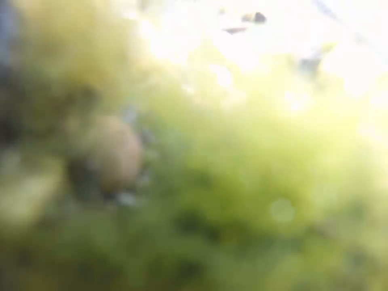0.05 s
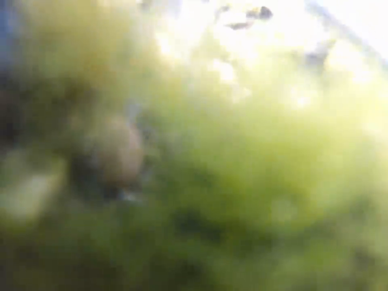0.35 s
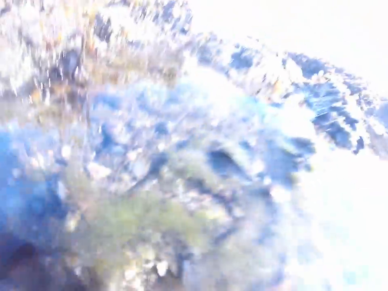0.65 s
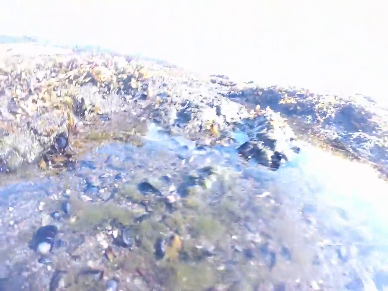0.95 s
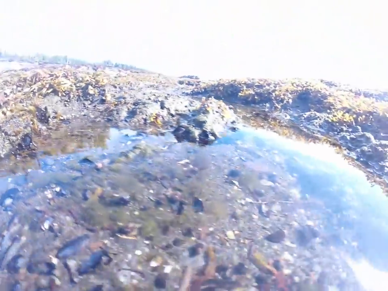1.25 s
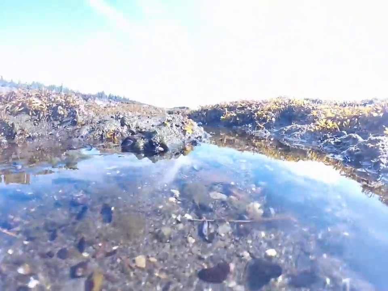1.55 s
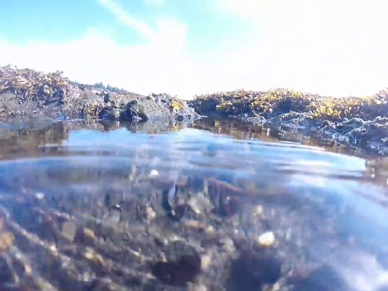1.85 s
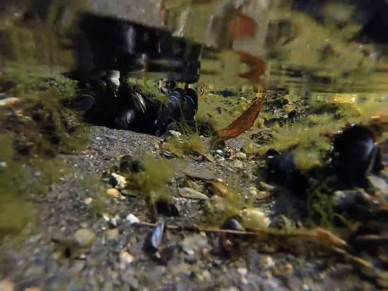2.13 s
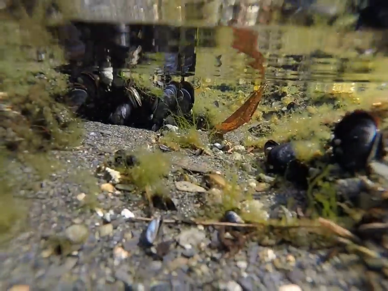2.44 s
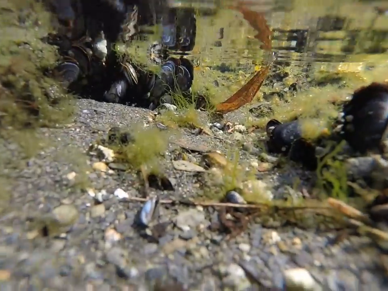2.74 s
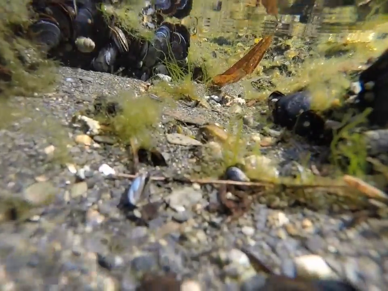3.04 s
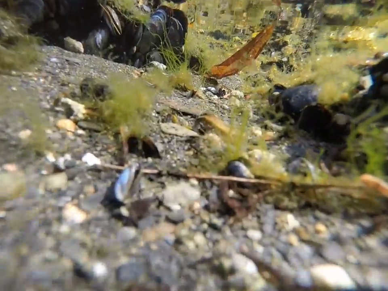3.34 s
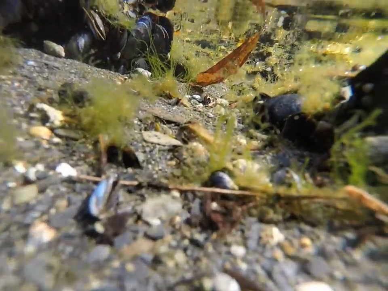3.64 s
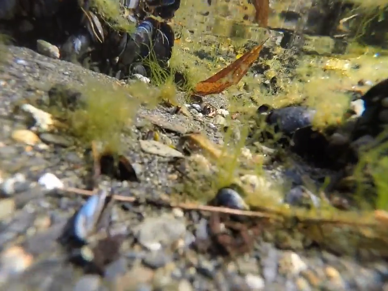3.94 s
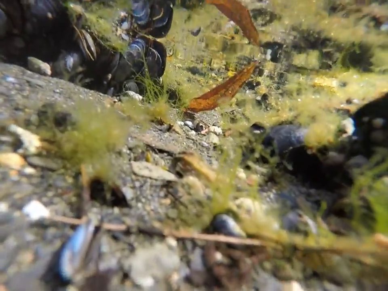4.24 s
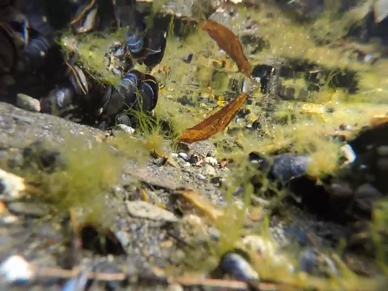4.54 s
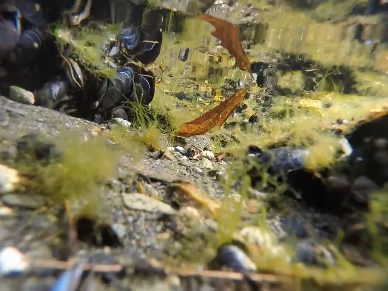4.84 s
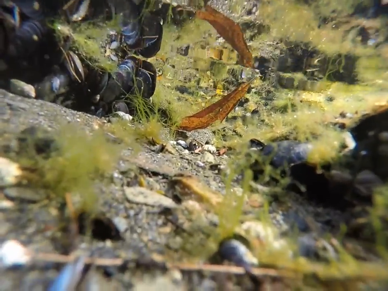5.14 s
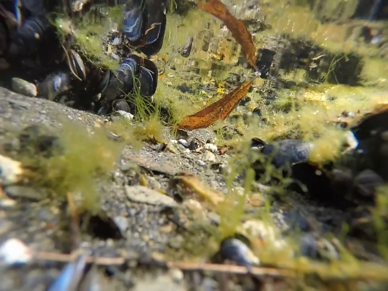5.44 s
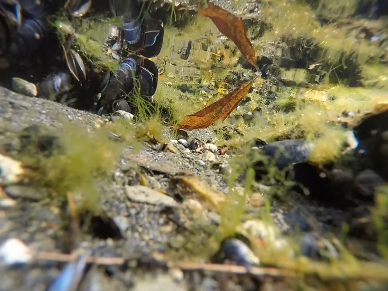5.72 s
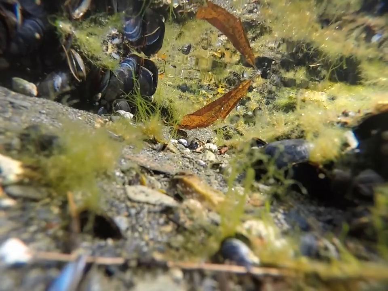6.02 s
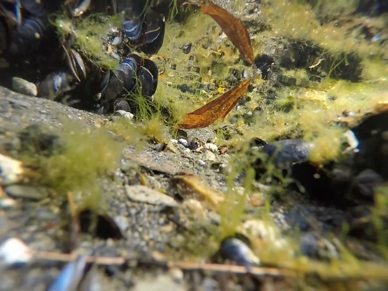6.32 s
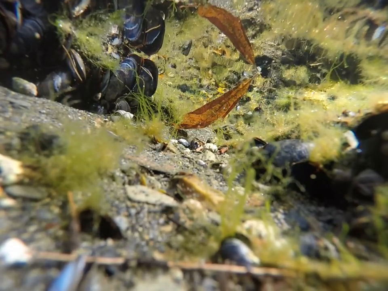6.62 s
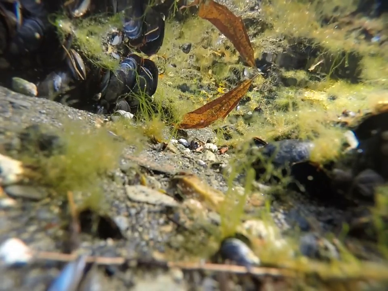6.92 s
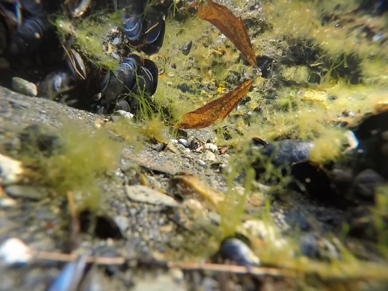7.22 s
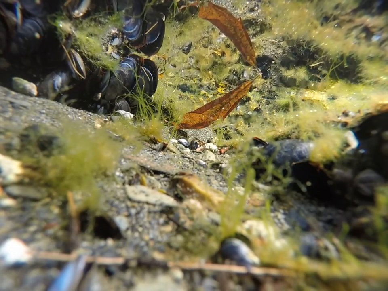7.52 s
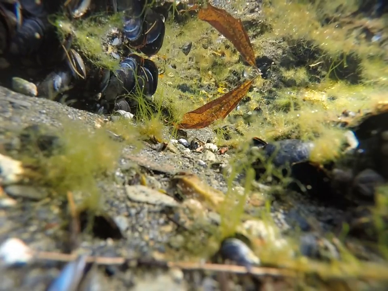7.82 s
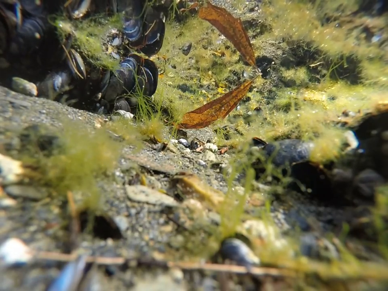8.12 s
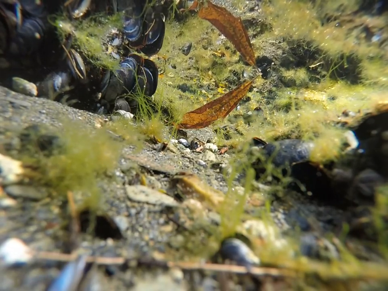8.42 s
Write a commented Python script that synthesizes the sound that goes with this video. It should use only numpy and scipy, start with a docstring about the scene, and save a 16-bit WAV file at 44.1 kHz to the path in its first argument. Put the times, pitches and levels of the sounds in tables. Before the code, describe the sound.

Weed rubs on a small waterproof camera with a soft wet crackle and a few knocks. After a faint fizz, bubbles plink in a quick cluster as it dips into a tide pool. Under water the case is pushed across gravel: grit scrapes, stones snap and thump, and a low rumble runs beneath. It then comes to rest, leaving a faint dull hiss. Everything is heard very close, from inside the case.

```python
"""First comes a wet crackle with a few knocks: a small waterproof camera rubs on weed as it leaves a
tide pool. Water fizzes on its case, then bubbles plink as it is dipped into another pool.
Under water the case is pushed across gravel: grit scrapes, stones snap and knock, and the case rumbles.
Each tiny hit makes the case ring briefly. Then it comes to rest and only a faint, dull hiss is left."""
import sys
import numpy as np
from scipy import signal
from scipy.fft import rfft, irfft, next_fast_len
from scipy.io import wavfile
from scipy.ndimage import uniform_filter1d, map_coordinates

SR = 44100
rng = np.random.default_rng(int(sys.argv[2]) if len(sys.argv) > 2 else 0)


def inscribe(sig):
    """Save sig as 16-bit PCM at rate SR to the path in sys.argv[1].

    A 1-D sig is mono; a 2-D sig holds one channel per row.
    Samples are clipped to [-1, 1] before scaling.
    """
    pcm = np.round(np.clip(np.atleast_2d(sig).T, -1, 1) * 32767)
    wavfile.write(sys.argv[1], SR, pcm.astype(np.int16))


N = 373527
TIME_S = np.arange(N) / SR

# Tone tables say how strong low and high sounds are. All levels are relative; the functions scale them.
# tone of light scraping: frequency_hz, level_db
SCRAPE_TONE = [(100, -31.5), (350, -15.5), (620, -12), (870, 1.5), (1150, -2), (1450, -4), (1750, 1),
               (2600, -0.5), (3750, -9), (4350, -25), (7000, -27.5), (10000, -39.5), (15000, -58.5)]
# tone of grinding under pressure: frequency_hz, level_db
GRIND_TONE = [(50, -17), (110, 1.5), (200, -1.5), (330, -4.5), (480, -2), (700, 2.5), (1100, -8.5),
              (1600, -7), (3000, -25.5), (4500, -26), (10500, -37.5), (15500, -65)]
# tone of grinding once the case has dug in: frequency_hz, level_db
DUG_IN_TONE = [(60, -9), (250, -9.5), (430, -5.5), (560, 3.5), (700, -2), (900, -16), (1600, -10),
               (3000, -30.5), (4500, -23), (5600, -49.5), (11000, -38.5), (15500, -73.5)]
# tone of sharp sand ticking: frequency_hz, level_db
SAND_TONE = [(2500, -25), (4200, -8.5), (5600, 1), (7400, 0), (8200, 0.5), (8550, -11), (9500, -6),
             (10600, -9), (11600, -18.5), (15500, -27)]


def gravel(scrape, press):
    """Grains catch and slip in clumps against the case; pressing on them adds a lower grinding."""
    dug_in = np.interp(TIME_S, (4.45, 4.9), [0, 1])
    jerkiness_db = 2 + 2.5 * dug_in  # the catching grows more uneven as the case slows
    clumps = amp(jerkiness_db * np.tanh(wobble(90)) + 3 * np.tanh(wobble(300)) - 1)
    rubbing = scrape * clumps * slips(per_s=3400, spread_db=3.5)
    rasp = through_case(rubbing, SCRAPE_TONE, vary_db=2.5)
    load = press * clumps * slips(per_s=3200, spread_db=5.5)
    grind = through_case(load * (1 - dug_in), GRIND_TONE, vary_db=2)
    grind += through_case(load * dug_in, DUG_IN_TONE, vary_db=1)
    ticks = scrape * clumps * slips(per_s=450, spread_db=7)
    sand = through_case(ticks, SAND_TONE, vary_db=2.5)
    return amp(2.5) * rasp + amp(0.5) * grind + amp(-19.5) * sand


# the steady push over the gravel: time_s, scrape_db
PUSH = [(2.135, -58), (2.18, -20), (2.27, -27), (2.37, -26.5), (2.46, -21), (2.61, -17), (2.79, -29.5),
        (2.88, -23.5), (3.17, -25), (3.29, -20.5), (3.55, -36), (3.79, -23), (3.98, -25), (4.05, -41),
        (4.2, -33), (4.64, -34.5), (4.74, -54.5), (5.0, -59)]
# the case leans on the gravel ever harder, then eases off: time_s, grind_above_scrape_db
LEAN = [(2.2, -11), (2.75, -9.5), (3.03, -1.5), (4.1, 5.5), (4.3, 6.5), (4.7, 3.5)]
# it breaks free in short jerks, weaker as it comes to rest: start_s, length_s, scrape_db, grind_db
JERKS = [(2.307, 0.021, -22, -32), (2.439, 0.0085, -21, -32), (3.06, 0.027, -26.5, -26.5),
         (3.247, 0.018, -20.5, -17), (3.738, 0.013, -21.5, -17), (3.797, 0.014, -19.5, -18.5),
         (4.153, 0.0098, -30.5, -19.5), (4.252, 0.006, -29, -17), (4.32, 0.056, -22.5, -16.5),
         (4.431, 0.007, -28, -18), (4.53, 0.077, -24.5, -20.5), (4.773, 0.018, -44, -40.5),
         (4.874, 0.0163, -29, -27), (4.943, 0.0093, -27.5, -28.5), (4.975, 0.027, -41, -37),
         (5.112, 0.027, -41.5, -28.5), (5.185, 0.064, -48.5, -48.5), (5.28, 0.048, -62, -57.5)]


def friction():
    """How hard the case scrapes and presses at each moment: a steady push with jerks on top."""
    push = level_curve(PUSH)
    jerk_scrape, jerk_press = strokes(JERKS, rise_db_per_s=698.5, fall_db_per_s=652.5)
    return np.hypot(push, jerk_scrape), np.hypot(push * level_curve(LEAN), jerk_press)


# hits on the case: those before 1 s are knocks while it is in the air, the rest are larger stones on the
# gravel: start_s, snap_db, thud_db, tick_db
CASE_HITS = [(0.0226, -18, -45, -33), (0.0418, -18, -27, -36), (0.127, -15.5, -32, -33),
             (.1857, -16, -28, -29), (0.2539, -20.5, -33, -31.5), (0.3522, -20, -31.5, -35),
             (.402, -17, -27, -30), (.7049, -10.5, -10, -31.5), (2.1719, -8, -27, -20),
             (2.2244, -7, -27, -15.5), (2.3155, -6.5, -21, -30.5), (2.3953, -4.5, -34, -34),
             (2.438, -1, -14, -27), (2.7094, -5, -29.5, -29), (2.742, -1.5, -23, -16.5),
             (3.0321, -4, -9, -24), (3.2374, -4.5, -13, -26.5), (4.1685, -3.5, -6.5, -27),
             (4.2099, -10, -1, -21), (4.244, -7, -2.5, -12), (4.25, -9.5, -0.5, -10),
             (4.2591, -14, -10, -6), (4.2655, -21, -11.5, -14.5), (4.4349, -6, -1, -16.5),
             (4.4827, -14.5, -8, -29.5), (4.5286, -6, -17.5, -12), (4.5657, -7, 2, -16.5),
             (4.9425, -9, -17, -47), (4.9864, -15.5, -44, -49), (5.224, -30, -48, -54),
             (5.299, -39, -47, -47), (5.5213, -40.5, -61, -65), (5.897, -48, -39.5, -56)]
# tone of a stone thumping the case: frequency_hz, level_db
THUD_TONE = [(40, -6.5), (130, 0.5), (500, -5), (900, -7.5), (2000, -24), (4500, -30), (7000, -54.5),
             (15000, -80)]


def stones(scrape, press):
    """Each hit snaps against the case, thumps it and chatters briefly."""
    out, t = np.zeros(N), np.arange(SR // 50) / SR
    for start_s, snap_db, thud_db, tick_db in CASE_HITS + pebbles(scrape, press):
        chatter = 0.1444 * rng.standard_normal(len(t)) * amp(-60 * t / .01)
        chatter[0] = 1  # the first hard contact
        for tone, level_db in (SCRAPE_TONE, snap_db + 1), (SAND_TONE, tick_db):
            crack = signal.fftconvolve(chatter, knock(tone, vary_db=2))
            add(out, start_s, at_peak(crack, level_db))
        add(out, start_s, amp(thud_db) * knock(THUD_TONE, vary_db=1.5))
    return out


def pebbles(scrape, press, count=16):
    """Extra stone hits from pebbles met at random, louder when the case rubs harder."""
    first_s, last_s = PUSH[1][0], PUSH[-1][0]
    hits = []
    for when, size in rng.random((count, 2)):
        start_s = first_s + when * (last_s - first_s)
        sample = int(start_s * SR)
        scrape_db, press_db = 20 * np.log10([scrape[sample], press[sample]]) + 4 * size
        hits.append((start_s, scrape_db + 11, press_db + 4.5, scrape_db - 1))  # snap, thud, tick
    return hits


# pockets of air closing at the water's surface: start_s, level_db, pitch_hz, tick_db
AIR_POCKETS = [(1.565, 1.5, 1000, -41.5), (1.581, -7.5, 1000, -49.5), (1.5824, -4, 2220, -42.5),
               (1.593, -5, 1650, -52), (1.594, -17.5, 577, -63), (1.628, -32.5, 1970, -46),
               (1.671, -18, 3060, -32), (1.707, -24.5, 1570, -31.5), (1.7275, -9.5, 2276, -24),
               (1.748, -6.5, 2520, -39), (1.7495, -12.5, 3000, -42), (1.767, -15, 2590, -20),
               (1.77, -14, 3600, -32.5), (1.7753, -8.5, 630, -32), (1.7875, -9, 1830, -54),
               (1.7999, -10, 1301, -46), (1.8062, -9.5, 920, -17), (1.8177, -2, 2657, -32),
               (1.8607, -28, 3520, -26.5), (1.8879, -3, 2940, -11), (1.8888, -7.5, 4350, -29.5),
               (1.9865, -25, 1740, -38), (2.004, -29, 2520, -24), (2.037, -26.5, 3830, -23),
               (2.0525, -13.5, 1630, -42), (2.054, -19, 2090, -49)]
# tone of a closing pocket's spray: frequency_hz, level_db
SPRAY_TONE = [(250, -18.5), (600, -4), (1000, 2), (1600, -2), (2700, 5), (3600, -12), (4500, -7.5),
              (5300, -18.5), (6300, -29.5), (12000, -39.5)]
# tone of its crisp tick: frequency_hz, level_db
TICK_TONE = [(2000, -10), (4400, 1), (5500, -1.5), (6600, -9.5), (9000, -9), (11000, -12.5), (13500, -13),
             (15500, -27)]


def bubbles():
    """Each air pocket snaps shut in a tiny spray, rings hard, then lingers as a small free bubble."""
    out, t = np.zeros(N), np.arange(SR // 10) / SR
    dull_above_pitch_hz, dull_db_per_octave = 1500, 22.5  # how the spray loses its highs
    for start_s, level_db, pitch_hz, tick_db in AIR_POCKETS:
        onset_s = start_s - .0003
        ring_s = .017 * (pitch_hz / 1000) ** -.3  # smaller, higher bubbles die away faster
        # the pitch starts a little high and settles while the pocket pinches off
        cycles = pitch_hz * (t + .12 * .002 * (1 - np.exp(-t / .002)))
        fade = amp(-60 * t / ring_s) + amp(-16.5 - cycles)  # the quiet tail loses 1 dB a cycle
        plink = np.sin(2 * np.pi * cycles) * fade * (1 - np.exp(-t / .00016))
        add(out, onset_s, at_peak(plink, level_db - 3.5))
        spray_db = level_db - 8.5 + 4 * np.log2(pitch_hz / 2000)  # small pockets are more spray
        edge_hz = pitch_hz + dull_above_pitch_hz
        dulled = [(hz, db - dull_db_per_octave * max(np.log2(hz / edge_hz), 0)) for hz, db in SPRAY_TONE]
        for tone, peak_db, fade_s in (dulled, spray_db, .017), (TICK_TONE, tick_db + .5, .009):
            burst = rng.standard_normal(len(t)) * amp(-60 * t / fade_s)
            splash = signal.fftconvolve(burst, case_ring(tone, vary_db=2))
            add(out, onset_s, at_peak(splash, peak_db))
    return out


def tiny_bubbles():
    """Tiny bubbles tick between the large ones while the water climbs the case."""
    out = np.zeros(N)
    for when, faintness in rng.random((12, 2)):
        start_s = np.interp(when, [0, 1], (1.7, 2.3))
        add(out, start_s, amp(-28 - 14 * faintness) * knock(TICK_TONE, vary_db=1))
    return out


# the case rubs on weed and wet sand as it is lifted: start_s, length_s, level_db
WEED_RUBS = [(0.0, 0.067, -29), (.127, 0.0044, -28.5), (.152, 0.057, -32), (.228, .028, -47),
             (.3, .18, -43.5), (.382, 0.017, -34)]
# tone of that rubbing: frequency_hz, level_db
WEED_TONE = [(150, -38), (250, -11.5), (463, -17.5), (815, -5.5), (1390, -10.5), (1920, 1.5), (2130, -6),
             (2660, -5.5), (5010, -14.5), (9130, -35), (15000, -43)]


def weed_crackle():
    """Weed catches and slips on the case in quick bursts, making a wet crackle."""
    rub, = strokes(WEED_RUBS, rise_db_per_s=1100, fall_db_per_s=600)
    crackle = unit(slips(per_s=3200, spread_db=5.5) * amp(6.6 * np.tanh(wobble(110))))
    return amp(-1) * through_case(rub * crackle, WEED_TONE, vary_db=2)


# a film of water fizzes on the case in the air: start_s, length_s, level_db
FIZZES = [(.715, 0.15, -55), (.767, 0.0041, -39.5), (.948, .02, -57), (1.53, .07, -48), (1.68, 0.037, -53)]
# tone of that fizz: frequency_hz, level_db
FIZZ_TONE = [(400, -23.5), (700, -13.5), (880, -3.5), (1200, -9.5), (2100, -12), (2600, 0.5), (3200, -17),
             (5000, -20), (7300, -30), (9800, -28.5), (14000, -42)]


def water_fizz():
    """Water left on the case fizzes in many tiny pops of nearly equal size."""
    film, = strokes(FIZZES, rise_db_per_s=699, fall_db_per_s=501.5)
    return through_case(film * slips(per_s=3800, spread_db=-0.5), FIZZ_TONE, vary_db=2)


# the hand shoves the case through air and water: start_s, length_s, level_db
SHOVES = [(0.0, 0.19, -43.5), (.39, 0.036, -38.5), (.7, 0.3, -40.5), (1.12, 0.025, -45),
          (1.385, .02, -39.5), (1.57, .03, -29.5), (1.72, 0.83, -42), (2.55, 0.16, -24.5), (2.94, .4, -27),
          (3.63, 0.065, -20), (4.34, .04, -24.5), (4.54, 0.042, -28.5), (4.76, .05, -41)]
# tone of the hand's deep bumps: frequency_hz, level_db
HAND_TONE = [(12, -10), (24, 1.5), (33, 2), (48, -9), (68, -3.5), (110, -17), (300, -59)]
# tone of dragging over the gravel: frequency_hz, level_db
DRAG_TONE = [(40, -25), (75, -1.5), (125, 0), (220, -18.5), (600, -56.5)]


def rumble(scrape, press):
    """The hand jostles the case in deep bumps; on the gravel, dragging adds a fuller rumble."""
    shove, = strokes(SHOVES, rise_db_per_s=302, fall_db_per_s=130)
    level = np.hypot(shove, amp(-11) * np.hypot(scrape, press))
    sway = noise(HAND_TONE)
    sway /= np.sqrt(np.abs(uniform_filter1d(sway ** 2, size=5000)))  # even out its loudness
    bumps = unit(amp(3.5 * np.tanh(wobble(18))))
    touching_down = np.interp(TIME_S, (2.25, 2.6), [.15, 1])
    drag = amp(-4.5) * touching_down * noise(DRAG_TONE)
    return level * bumps * (sway + drag)


# loudness of the background hiss: time_s, level_db
HISS_LEVELS = [(0, -54.5), (1.3, -53.5), (5.0, -57.5), (5.4, -58), (5.85, -55), (8.47, -55)]
# tone of that hiss: frequency_hz, level_db
HISS_TONE = [(12, -38), (20, -4.5), (64, 0), (238, -5), (266, -6.5), (534, -10), (649, -10.5), (705, -11),
             (767, -12.5), (1040, -15), (4190, -24.5), (4550, -25.5), (5690, -29), (14300, -42),
             (15500, -51.5)]


def hiss():
    """A faint, dull, nearly steady hiss lies under everything."""
    return level_curve(HISS_LEVELS) * noise(HISS_TONE)


# pitches the case boosts or softens: pitch_hz, width_hz, boost_db
CASE_PITCHES = [(810, 100, 2), (1235, 110, 2.5), (1714, 150, 4), (2540, 170, 3), (3074, 290, 4),
                (3540, 220, 2.5), (4000, 250, -1.5), (4810, 260, 2), (5700, 260, -1.5), (7150, 200, 2),
                (7890, 270, 6), (9000, 280, 3.5)]


def case_ring(tone, vary_db, size=2048):
    """The short ring of the tapped case; each spot on it sounds a little different."""
    hz = np.fft.rfftfreq(size, 1 / SR)
    boost_db = sum(db / (1 + (2 * (hz - pitch) / width) ** 2) for pitch, width, db in CASE_PITCHES)
    spot_db = vary_db * unit(uniform_filter1d(rng.standard_normal(len(hz)), size=14))
    # turn the tone into a ring that starts at the tap, never before it (minimum phase)
    cepstrum = irfft(np.log(amp(tone_db(tone, hz) + boost_db + spot_db)))
    cepstrum[1:size // 2] *= 2
    cepstrum[size // 2 + 1:] = 0
    ring = irfft(np.exp(rfft(cepstrum)))
    return ring / np.linalg.norm(ring)


def through_case(force, tone, vary_db, spots=6):
    """Hits ring the case around a point of contact that wanders over a few spots."""
    spot = np.floor(1.4 * wobble(9) + 1.5 * rng.random(N)) % spots
    first, last = np.flatnonzero(np.abs(force) > amp(-80))[[0, -1]]  # skip the silent ends
    out = np.zeros(N)
    for k in range(spots):
        hits = force[first:last] * (spot[first:last] == k)
        add(out, first / SR, signal.oaconvolve(hits, case_ring(tone, vary_db)))
    return out


def knock(tone, vary_db):
    """One hit on the case, with a peak of 1."""
    return -at_peak(case_ring(tone, vary_db), 0)


def slips(per_s, spread_db):
    """Tiny hits at random times, some larger than the rest."""
    hits = np.flatnonzero(rng.random(N) < per_s / SR)
    sizes, sides = rng.standard_normal(N)[hits], rng.choice([-1, 1], N)[hits]
    force = np.zeros(N)
    force[hits] = sides * amp(spread_db * np.minimum(sizes, 1.9))
    return unit(force)


def strokes(rows, rise_db_per_s, fall_db_per_s):
    """One loudness curve for each dB column: every stroke rises, holds and dies away."""
    t = np.arange(0, N, 16) / SR
    power = 0
    for start_s, length_s, *levels_db in rows:
        rise_db = rise_db_per_s * np.maximum(start_s - t, 0)
        fall_db = fall_db_per_s * np.maximum(t - start_s - length_s, 0)
        power = power + amp(np.add.outer(levels_db, -rise_db - fall_db)) ** 2
    return [np.interp(TIME_S, t, np.sqrt(column)) for column in power]


def level_curve(rows):
    """A loudness curve through (time_s, level_db) rows, silent outside them."""
    time_s, level_db = np.transpose(sorted(rows))
    return amp(np.interp(TIME_S, time_s, level_db, left=-120, right=-120))


def wobble(per_s):
    """A smooth curve through per_s random values a second."""
    coarse = np.arange(0, N + 16, 16)
    values = rng.standard_normal(int(N * per_s / SR) + 4)
    curve = map_coordinates(values, [coarse * per_s / SR], mode="nearest")
    return np.interp(np.arange(N), coarse, curve)


def noise(tone):
    """Noise with the given tone, at a strength of 1."""
    return unit(filtered(rng.standard_normal(N), lambda hz: amp(tone_db(tone, hz))))


def tone_db(tone, hz):
    """Read a tone table at any frequency, gliding between its rows."""
    frequency_hz, level_db = np.transpose(tone)
    return np.interp(np.log(hz + 1), np.log(frequency_hz + 1), level_db)


def filtered(sound, gain_at):
    """Turn each frequency up or down by gain_at(hz)."""
    size = next_fast_len(N + SR // 2)
    return irfft(rfft(sound, size) * gain_at(np.fft.rfftfreq(size, 1 / SR)), size)[:N]


def amp(db):
    """Turn decibels into a multiplier."""
    return 10 ** (np.asarray(db) / 20)


def unit(sound):
    """Scale to an average strength (rms) of 1."""
    return sound / np.sqrt(np.mean(sound ** 2) + 1e-20)


def at_peak(sound, peak_db):
    """Scale so the largest peak is at peak_db."""
    return amp(peak_db) * sound / np.abs(sound).max()


def add(track, start_s, sound):
    """Mix a sound into the track at start_s."""
    part = track[max(round(start_s * SR), 0):][:len(sound)]
    part += sound[:len(part)]


def scene():
    """Mix the gravel bed, the wet sounds and the hiss, as heard from inside the case."""
    scrape, press = friction()
    bed = gravel(scrape, press) + stones(scrape, press) + rumble(scrape, press)
    water = weed_crackle() + water_fizz() + bubbles() + tiny_bubbles()
    return bed + water + hiss()


def record(dry):
    """Round off the largest peaks, soften the highest treble and cut everything above it."""
    ceiling, soften_hz, cut_hz = .95, 14000, 15300
    rounded = dry / (1 + np.abs(dry / ceiling) ** 6) ** (1 / 6)
    return filtered(rounded, lambda hz: (hz < cut_hz) / np.sqrt(1 + (hz / soften_hz) ** 12))


dry = scene()
out = record(dry)
inscribe(out)
```